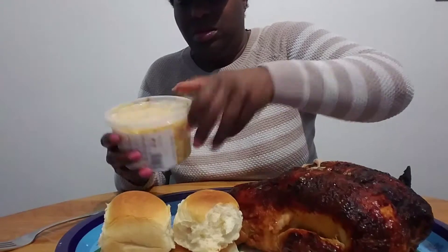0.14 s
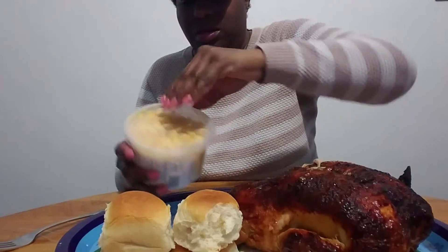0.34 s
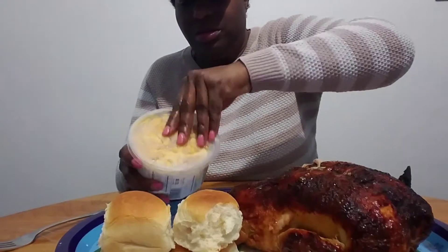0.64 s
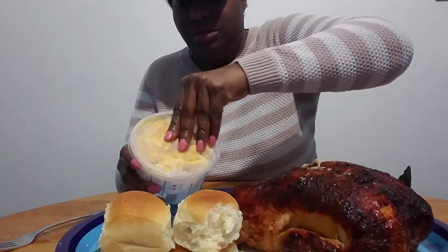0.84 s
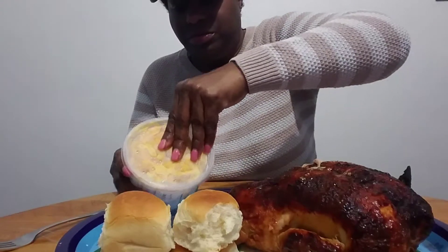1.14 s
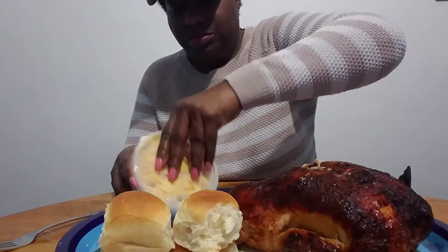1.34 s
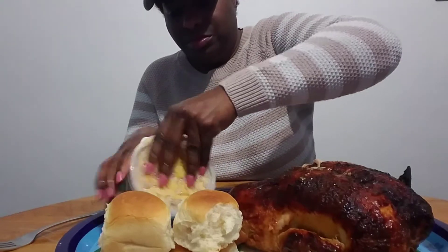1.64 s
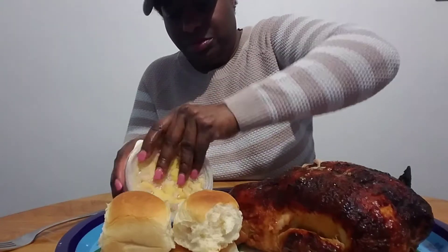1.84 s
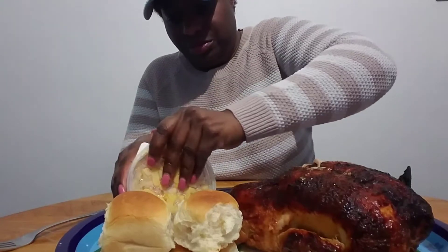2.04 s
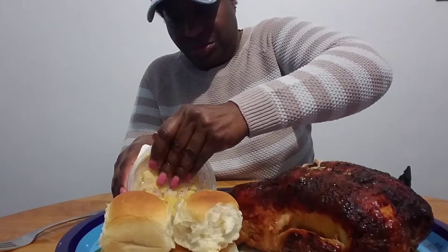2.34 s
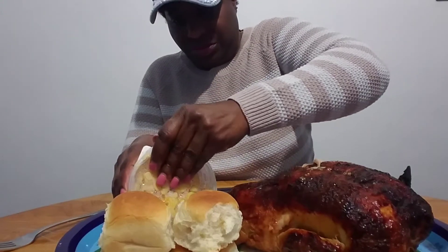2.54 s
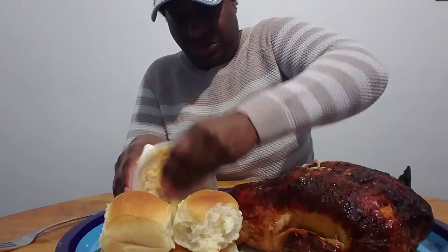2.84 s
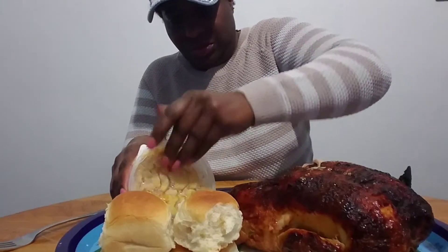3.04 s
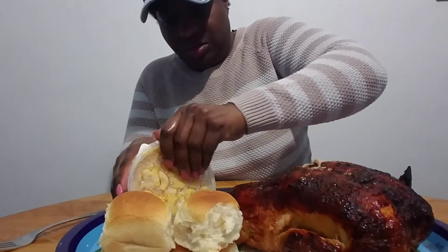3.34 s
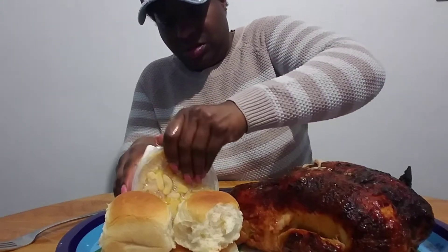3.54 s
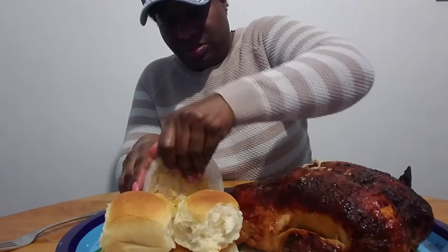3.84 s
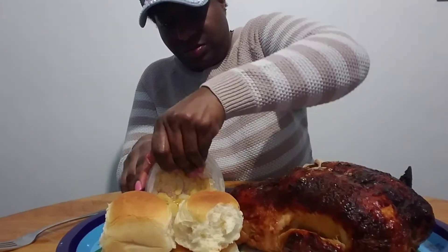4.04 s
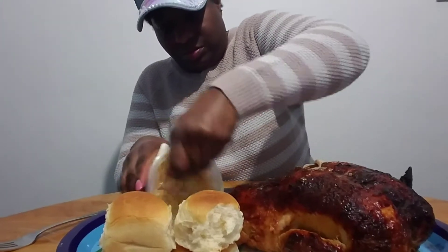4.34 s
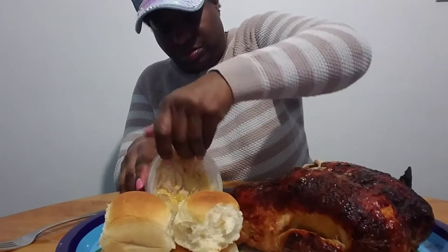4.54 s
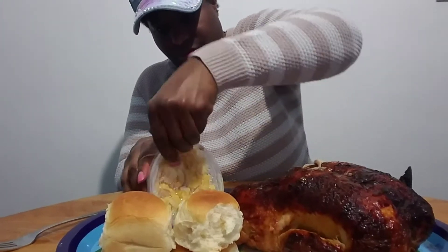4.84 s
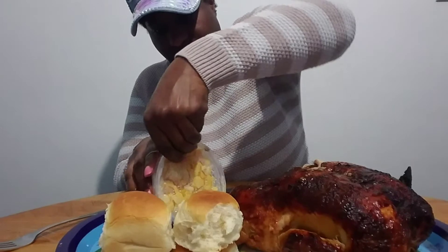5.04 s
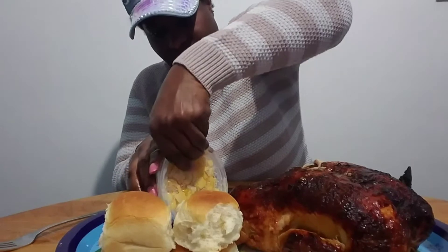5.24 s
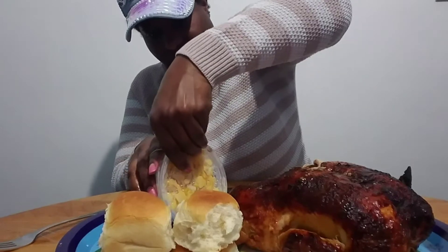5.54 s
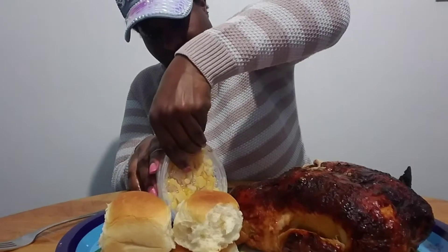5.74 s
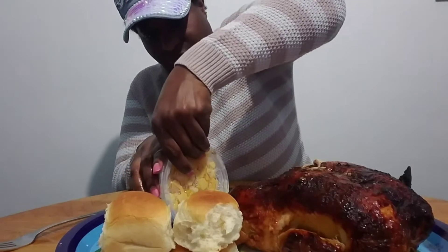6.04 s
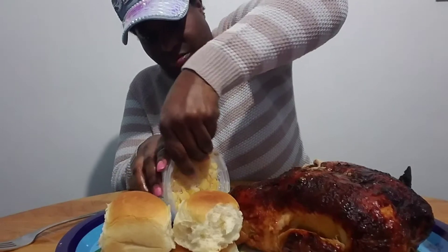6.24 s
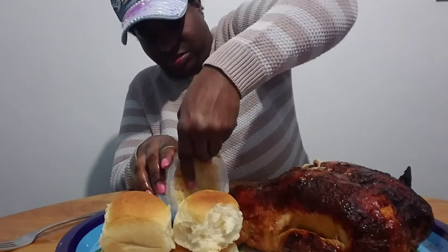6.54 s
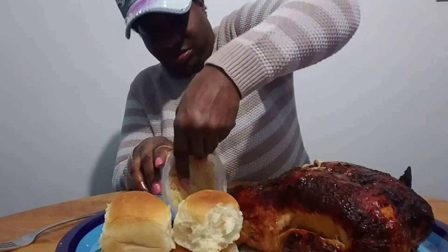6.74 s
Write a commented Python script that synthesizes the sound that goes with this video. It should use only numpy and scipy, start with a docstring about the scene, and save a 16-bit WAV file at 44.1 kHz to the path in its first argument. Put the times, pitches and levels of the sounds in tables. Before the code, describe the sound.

Close, irregular snaps and crinkles of a stiff plastic tub being handled, with short creaks and a few soft knocks on a table.

```python
"""A plastic food tub on a table in a small room, close to a two-port microphone, a little to its left.
Over faint hiss, fingers rustle on the lid and start to pry. The stiff plastic buckles in short snaps
that ring wall, lid and rim, and the room answers each one. Soon the base knocks the table and the rim
creaks in stick-slip runs. Snaps come in loose clusters, then crowd together from 6.3 s to the end."""
import sys
import numpy as np
from scipy import signal
from scipy.fft import rfft, irfft, next_fast_len
from scipy.io import wavfile
from scipy.ndimage import map_coordinates

SR = 44100
rng = np.random.default_rng(int(sys.argv[2]) if len(sys.argv) > 2 else 0)


def inscribe(sig):
    """Save sig as 16-bit PCM at rate SR to the path in sys.argv[1].

    A 1-D sig is mono; a 2-D sig holds one channel per row.
    Samples are clipped to [-1, 1] before scaling.
    """
    pcm = np.round(np.clip(np.atleast_2d(sig).T, -1, 1) * 32767)
    wavfile.write(sys.argv[1], SR, pcm.astype(np.int16))


N = 303408


def amp(db):
    """Gain of a level in dB."""
    return 10 ** (np.asarray(db) / 20)


def along(points, hz):
    """Curve through (f/Hz, value) points on a log frequency axis."""
    f, value = np.transpose(points)
    return np.interp(np.log(hz + 1), np.log(f + 1), value)


def filtered(x, response):
    """x through a complex frequency response."""
    size = next_fast_len(x.shape[-1] + 8192)
    return irfft(rfft(x, size) * response(np.fft.rfftfreq(size, 1 / SR)), size)[..., :x.shape[-1]]


def paired(a, b, likeness):
    """Two unrelated spectra mixed into left and right of a given likeness."""
    turn = np.arccos(np.clip(likeness, -1, 1)) / 2
    mid, side = np.cos(turn) * a, np.sin(turn) * b
    return np.array([mid + side, mid - side])


def noise(spectrum, likeness):
    """Coloured stereo noise of rms 1."""
    hz = np.fft.rfftfreq(N, 1 / SR)
    white = rfft(rng.standard_normal((2, N)))
    pair = irfft(paired(*white, along(likeness, hz)) * amp(along(spectrum, hz)), N)
    return pair / pair.std()


HISS_SPECTRUM = [(20, -11), (85, -16), (117, -8), (141, -13.5), (222, -8.5), (349, -12), (400, -4.5),
                 (450, -11), (650, -10.5), (1500, -13.5), (4000, -21.5), (9000, -28), (14500, -26.5)]  # noise floor: f/Hz, relative density/dB
HISS_LIKENESS = [(60, 0.253), (300, 0.45), (640, 0.055), (1400, 0.0088)]  # noise floor between the ports: f/Hz, left-right likeness
def hiss():
    """Steady noise of room and microphone, alike at both ports only in the bass."""
    return amp(-68.5) * noise(HISS_SPECTRUM, HISS_LIKENESS)


FINGER_SLIDES = [(0.0, -70.5), (0.63, -72), (0.75, -87), (0.98, -89), (1.22, -70), (1.7, -65), (1.95, -88),
                 (2.97, -82.5), (3.7, -68), (4.08, -74.5), (4.23, -78.5), (5.021, -72.5), (5.65, -77),
                 (5.79, -61.5), (5.88, -85), (6.15, -59.5), (6.27, -86.5), (6.322, -68), (6.5, -88.5),
                 (6.88, -68)]  # fingers sliding on the tub: t/s, level/dB
SKIN_SPECTRUM = [(1500, -2.5), (4000, -15.5), (8000, -11.5), (13000, -9.5)]  # skin on plastic: f/Hz, relative density/dB
def rustle():
    """Close to the microphone, skin drags over the plastic in small uneven catches."""
    times, db = np.transpose(FINGER_SLIDES)
    catches = map_coordinates(rng.standard_normal(N // 700 + 4), [np.arange(N) / 700])
    level = np.interp(np.arange(N) / SR, times, db) - 5.5 + 2.4 * catches
    return amp(level) * noise(SKIN_SPECTRUM, likeness=[(5000, 0.11)])


def ringing(times, db, modes, rise_s, detune):
    """Every blow rings the modes anew: the grip shifts their pitch, strength and phase a little."""
    hz, t60, level = np.transpose(modes)[:, None, :, None]
    pitch, strength, phase = rng.standard_normal((len(times), 3, len(modes), 1)).transpose(1, 0, 2, 3)
    phase = 0.238 * phase + np.pi * np.arange(len(modes))[:, None]  # neighbours start opposed
    t = np.arange(round(t60.max() * SR)) / SR
    decay = amp(level + 1.65 * strength - 60 * t / t60)
    tones = decay * np.sin(2 * np.pi * hz * (1 + detune * pitch) * t + phase)
    rings = tones.sum(1) * (1 - np.exp(-t / rise_s)) * amp(db)[:, None]
    at = (times * SR).astype(int)[:, None] + np.arange(len(t))
    return np.bincount(at.ravel(), rings.ravel(), N + SR)[:N]


# Modes of the tub, from its low wall to the highest fizz of a snap: f/Hz, t60/s, level/dB
WALL_MODES = [(328.75, 0.02844, -6.5), (457.5, 0.0162, 0), (586.6, 0.0168, 4), (682.3, 0.0165, -7.5)]
LID_MODES = [(765.4, 0.01391, -2.5), (980.8, 0.01708, 0), (1302, 0.016, -1), (1497.8, 0.00571, -2)]
RIM_MODES = [(1653, 0.01614, -3), (2064, 0.01032, -1), (2243.7, 0.01014, -6), (2410.7, 0.01111, -0.5)]
LIP_MODES = [(2871, 0.00911, -2), (3361, 0.00658, 0.56), (3715, 0.00867, -2), (3958, 0.004406, 2.46)]
CRACK_MODES = [(5025, 0.00279, 4), (6134, 0.00437, -1.48), (6952, 0.00295, -1.87), (8348, 0.002294, 0.45)]
FIZZ_MODES = [(9430, 0.00457, -2.5), (10410, 0.00294, 0), (12080, 0.00483, -1.5), (13230, 0.00379, 0),
              (14300, 0.00267, 2.3)]
# Buckles: t/s, lid level/dB, wall/dB re lid, sharpness/dB re lid, rim emphasis/dB
BUCKLES = [(0.143, -50, -6, -6.5, 3), (0.253, -54.5, -24, -12, 7), (0.468, -37.5, -11.5, -20, -2.5),
           (0.537, -51, -8, -13.5, 5), (0.581, -59.5, -3, -6.5, 3.5), (0.612, -41.5, -6, -22, 2),
           (0.616, -52.5, -6.5, 4.5, -6.5), (0.702, -39, -5.5, -8.5, 0.5), (0.716, -44.5, -13.5, -12.5, 3),
           (0.747, -46, -19.5, -10, 4), (0.757, -39, -2, -12.5, 1), (0.766, -25.5, -2.5, -23, 1),
           (0.794, -33, -39.5, -27.5, 0.7), (1.151, -45, -18.5, -16, 7.5), (1.381, -47.5, -3.5, -23.5, 2.5),
           (1.425, -56, 0.06, -13.5, 2), (1.463, -49, -21, -29.5, 7), (1.478, -39.5, -12.5, -23.5, 3.5),
           (1.53, -48, -24.5, -25, 10), (1.575, -43.5, -12.5, -16, 3.5), (1.598, -39, -11.5, -14.5, 4),
           (1.649, -49.5, -8.5, -11.5, 1), (1.873, -53, -5.5, -20.5, 5.5), (1.9, -24, -18.5, -25, -1),
           (1.938, -38.5, -11, -21, -5), (1.949, -35.5, -15, -28.5, -4.5), (1.979, -38, -32.5, -19.5, 0),
           (2.028, -38.5, -11, -26.5, 2.5), (2.04, -48, -4.5, -25.5, 3), (2.12, -32, -12, -26.5, 3.5),
           (2.141, -40, -9.5, -21.5, 1), (2.193, -39.5, -20, -15.5, -1), (2.295, -42.5, -7.5, -15.5, -0.5),
           (2.335, -41, -27, -26.5, 5), (2.605, -38, -18, -12, -2), (2.647, -45.5, -13.5, -27, 4),
           (2.777, -36.5, -8, -17, -5.5), (2.786, -34, -4.5, -37.5, 8.5), (2.795, -35, -4.5, -21.5, 1),
           (2.807, -25, -7.5, -11, 2), (2.92, -35.5, -8.5, -30, 5.5), (3.018, -65, 5.5, -11, -8.5),
           (3.285, -45, 1, -22, -2.5), (3.31, -33, -9.5, -24.5, 4), (3.367, -48, -16, -29.5, 11.5),
           (3.42, -44.5, -7.5, -19, 1.5), (3.726, -48, -12.5, -26, -3), (3.743, -30.5, -20.5, -30.5, 1.07),
           (3.785, -37.5, -12, -19, -5.5), (3.872, -54, -8.5, -6.5, -4.5), (3.88, -59.5, -11, -7, -3.5),
           (3.973, -45, -13, -25.5, 5.5), (3.99, -46, -14.5, -22.5, 2), (4.009, -52.5, -15.5, -20, 7.5),
           (4.032, -42.5, -6, -19, 1.5), (4.084, -35.5, -8, -19.5, -3), (4.171, -36.5, -11.5, -21, -2),
           (4.296, -37.5, -11.5, -23, 2), (4.305, -22.5, -13, -16.5, -3.5), (4.652, -51.5, -30, -25, 2),
           (4.7, -67, -14, 3.5, -10.5), (4.805, -47, -22, 1, -5), (4.89, -48, -14, -29, -2.5),
           (4.903, -47, -15, -23.5, 6), (4.942, -51, -7.5, -20.5, 2), (4.974, -50.5, -14, -23.5, 2.5),
           (4.998, -49, -8, -24, -0.5), (5.022, -49.5, -21.5, -26, 1), (5.101, -53, -22.5, -21.5, 1),
           (5.125, -43.5, -14, -25.5, 3.5), (5.139, -47.5, -6.5, -16, 0), (5.198, -49.5, -4.5, -22.5, 4.5),
           (5.285, -53, -26.5, -14.5, 3.5), (5.35, -23.5, -11, -19.5, 1.5), (5.451, -51.5, -10, -27, -1.2),
           (5.47, -52.5, -21.5, -21, -1.74), (5.61, -48, -17.5, -24.5, -0.5), (5.62, -50, -11, -5, -3.5),
           (5.67, -49.5, -2, -5, -0.38), (5.704, -53, -18, -20.5, -4.5), (5.725, -48, -14.5, -22, 0),
           (5.731, -51, -5.5, -19, -3), (5.752, -45.5, -16, -17.5, -8), (5.765, -45.5, -11, -24, -6),
           (5.784, -48, -20, -19.5, 0), (5.813, -46.5, -15, -15.5, -3.5), (5.842, -34, -4.5, -13.5, -1),
           (6.046, -53.5, -13, -5.5, -1.5), (6.14, -56, 1, -5.5, -9.5), (6.167, -46.5, -5.5, -19.5, -2.5),
           (6.197, -44, -20, -28.5, 6), (6.217, -44, -21, -33.5, 10.5), (6.284, -38.5, -19, -14, 1),
           (6.302, -41, -26.5, -14.5, -7.5), (6.317, -34, -17, -20.5, -4), (6.335, -40, -32.5, -18, 0.5),
           (6.35, -51, -27, -8, 0), (6.367, -42, -17.5, -7.5, -1.23), (6.385, -42.5, -31.5, -13.5, -2),
           (6.402, -33, -16.5, -19.5, -5), (6.427, -48.5, -29.5, -20, 6), (6.451, -57, -9, -3, 2.5),
           (6.474, -36.5, -11.5, -12, -0.5), (6.485, -27.5, -16.5, -26.5, .5), (6.507, -33, -14, -6.5, 5.5),
           (6.558, -45, -19.5, -6.5, -7.5), (6.606, -45.5, -10.5, -26.5, -3), (6.71, -54, -8.5, -23.5, 3.5),
           (6.734, -41.5, -21.5, -18.5, 2.5), (6.769, -36, -14.5, -23.5, 0.35),
           (6.778, -26, -33, -20.5, -0.5), (6.797, -30, -17, -8, 0.5), (6.814, -32.5, -3, -11.5, 3),
           (6.826, -34.5, -21.5, -8.5, -0.5), (6.841, -25.5, -7, -20.5, -3.5), (6.847, -28, -6.5, -30, -5),
           (6.856, -22.5, -18, -23, 0.5)]
def snapping_tub(slips, gain_db, parts_db, late_s=0):
    """Each buckle or rim slip rings the whole tub, the small stiff parts more when it is sharp."""
    times, lid, wall, sharpness, emphasis = np.transpose(BUCKLES + slips)
    scatter_db = 1.1 * rng.standard_normal((len(times), 4)).T
    rim = 0.6505 * sharpness + 0.92 + scatter_db[0] + emphasis
    lip = 0.873 * sharpness + 0.54 + scatter_db[1] + 0.815 * emphasis
    crack = 0.919 * sharpness - 0.174 + scatter_db[2]
    fizz = 1.105 * sharpness - 0.5 + scatter_db[3]
    times = times + late_s * (1 + rng.uniform(size=len(times)))  # detour of a reflection
    lid = lid + gain_db
    parts = lid + parts_db  # lifts everything but the lid
    sound = (ringing(times, lid, LID_MODES, rise_s=0.000116, detune=0.0314)
             + ringing(times, parts + wall, WALL_MODES, rise_s=0.000533, detune=0.02875)
             + ringing(times, parts + rim, RIM_MODES, rise_s=0.000408, detune=0.0342)
             + ringing(times, parts + lip, LIP_MODES, rise_s=0.000084, detune=0.0262)
             + ringing(times, parts + crack, CRACK_MODES, rise_s=0.000113, detune=0.036)
             + ringing(times, parts + fizz, FIZZ_MODES, rise_s=0.0001, detune=0.044))
    return filtered(sound, lambda hz: (1j * hz / (230 + 1j * hz)) ** 2)  # bass below about 230 Hz falls away


PORT_BALANCE = [(100, 6.5), (500, 0.5), (1000, 3.5), (2000, 6), (4000, 11), (8000, 18.5), (13000, -13.5)]  # the tub at the microphone: f/Hz, left over right/dB
def microphone_ports(x, lag_s):
    """Close sound is mostly louder at the left port, and reaches it lag_s later by a longer path."""
    sides = np.array([[0.5], [-0.5]])
    return filtered(x, lambda hz: amp(sides * along(PORT_BALANCE, hz))
                    * np.exp(-2j * np.pi * hz * sides * lag_s))


ROOM_DECAY = [(200, 0.235), (600, 0.258), (1400, 0.257), (3700, 0.2436), (9700, 0.197)]  # the small room's reverberation: f/Hz, t60/s
ROOM_LEVEL = [(80, 2), (300, -3.5), (1000, -5.5), (3000, 3.5), (8000, 7.5), (14000, 4)]  # its energy: f/Hz, level/dB re direct sound
ROOM_LIKENESS = [(200, 0.355), (600, 0.54), (1500, 0.067), (3000, 0.012)]  # its spread over the ports: f/Hz, left-right likeness
def room(x, delay_s):
    """Each frequency dies at its own speed; each stretch meets the walls from a new hand position."""
    out, hop = np.zeros((2, N + SR)), SR // 6
    for i in range(0, N, hop):
        hz, t, spectra = signal.stft(rng.standard_normal((2, SR // 3)), SR, nperseg=256)
        t60 = along(ROOM_DECAY, hz)[:, None]
        spectra = paired(*spectra, along(ROOM_LIKENESS, hz)[:, None])
        spectra *= amp(along(ROOM_LEVEL, hz)[:, None] - 60 * t / t60)
        unit_energy = np.sqrt(6 * np.log(10) / SR / t60)
        tail = signal.istft(spectra * unit_energy, SR, nperseg=256)[1]
        wet = signal.fftconvolve(x[None, i:i + hop], tail, axes=1)
        out[:, i + round(delay_s * SR):][:, :wet.shape[1]] += wet
    return out[:, :N]


KNOCKS = [(0.253, -71), (0.766, -46), (1.38, -59), (1.899, -51), (2.118, -60.5), (2.806, -58),
          (2.917, -60.5), (3.305, -64), (4.304, -55.5), (5.343, -57), (5.839, -57), (6.481, -56),
          (6.794, -54), (6.838, -55.5)]  # the base meeting the table: t/s, level/dB
BASE_MODES = [(115.4, 0.039, -1), (174, 0.0364, 0.5), (246.1, 0.0286, 5.5)]  # modes of the base: f/Hz, t60/s, level/dB
def table_knocks():
    """The tub's base knocks the table, which radiates little deep bass."""
    thuds = ringing(*np.transpose(KNOCKS), BASE_MODES, rise_s=0.002, detune=0.0448)
    return filtered(thuds, lambda hz: 1j * hz / (90 + 1j * hz))


# Creaks of the rim: start t/s, end t/s, slip rate/Hz, unevenness of spacing (0-1),
# lid level/dB, wall/dB re lid, sharpness/dB re lid, rim emphasis/dB
RIM_CREAKS = [(0.729, 0.765, 171.4, 0.29, -49, -15, -16.5, 8),
              (0.796, 0.838, 154.3, .3, -56.5, -11.5, -31.5, 3.5),
              (0.932, 1.031, 79, 0.02, -47, -16, -21.5, 7.5), (1.157, 1.225, 150, .12, -49.5, -15, -26, 9),
              (1.583, 1.666, 85.3, 0.33, -54.5, -11.5, -27, 3.5),
              (1.909, 2.061, 90.4, 0.25, -48, -15.5, -24.5, 6), (3.273, 3.351, 95, 0.19, -64, -23, -24, 11),
              (3.81, 3.845, 210, .3, -55, -2.5, -20, 6), (4.233, 4.271, 282, 0.31, -68.5, -16, -4, -1.5),
              (6.333, 6.47, 67, 0.19, -59.5, -27.5, -22.5, -1),
              (6.773, 6.88, 219.3, 0.31, -38.5, -7, -17.5, 5)]
def rim_slips(swell_db, scatter_db):
    """The rim sticks and slips unevenly, loudest mid-creak; each slip is a row like a buckle's."""
    slips = []
    for start, end, rate, unevenness, db, *timbre in RIM_CREAKS:
        spacing, size = rng.standard_normal((60, 2)).T
        gaps = np.exp(unevenness * spacing) / rate
        times = start + np.cumsum(gaps) - gaps[0]
        from_middle = 2 * (times - start) / (end - start) - 1
        levels = db - swell_db * from_middle ** 2 + scatter_db * size
        slips += [(t, level, *timbre) for t, level in zip(times, levels) if t < end]
    return slips


def scene():
    """The microphone hears the tub close up, then twice off the table top, then off the back wall and room."""
    slips = rim_slips(swell_db=1.5, scatter_db=2.5)
    direct = snapping_tub(slips, gain_db=-2, parts_db=7.5) + table_knocks()
    off_table = snapping_tub(slips, gain_db=-5, parts_db=8.5, late_s=0.0011197)
    off_table_again = snapping_tub(slips, gain_db=-11.5, parts_db=13, late_s=0.0023)
    off_wall = snapping_tub(slips, gain_db=-20, parts_db=11.5, late_s=0.0081)
    close = microphone_ports(direct + off_table + off_table_again, lag_s=85e-6)
    reverb = amp([[0.7], [-0.7]]) * room(direct, delay_s=0.006)  # leans left
    return close + off_wall + reverb + hiss() + rustle()


def record(dry):
    """A small constant offset, a step down in the top treble and a band limit."""
    offset, step_hz, top_hz = -0.0004, 14750, 16000
    return filtered(dry + offset, lambda hz: (amp(-25) + 1 / (1 + (hz / step_hz) ** 150)) * (hz < top_hz))


dry = scene()
out = record(dry)
inscribe(out)
```